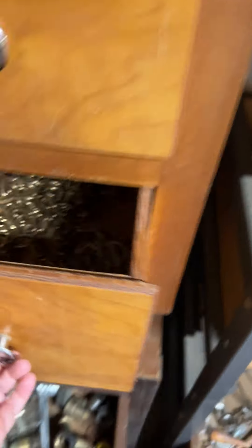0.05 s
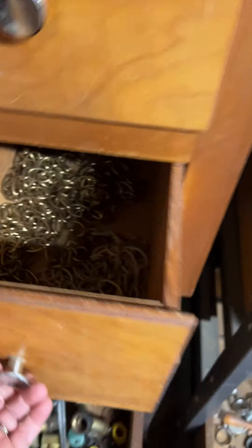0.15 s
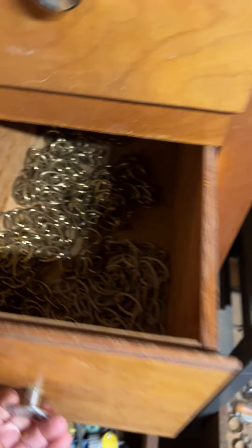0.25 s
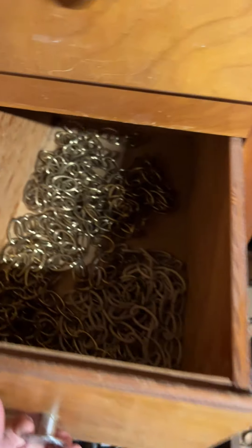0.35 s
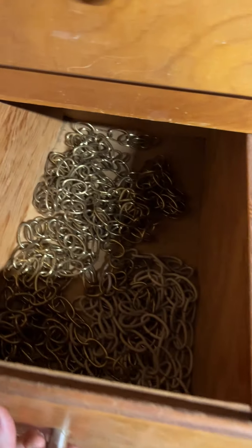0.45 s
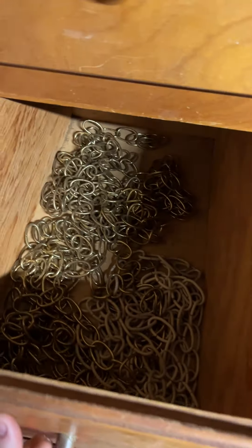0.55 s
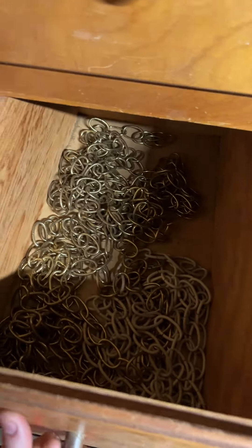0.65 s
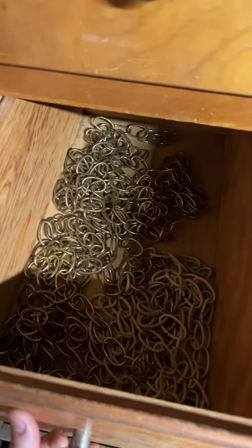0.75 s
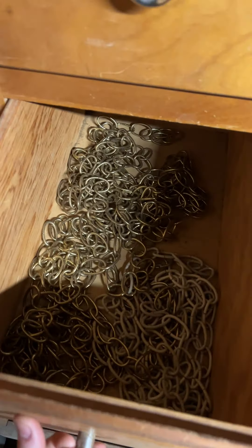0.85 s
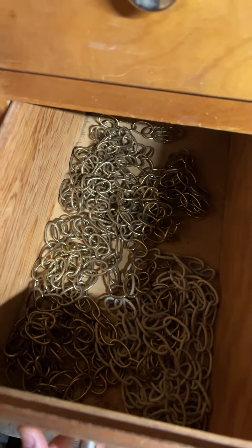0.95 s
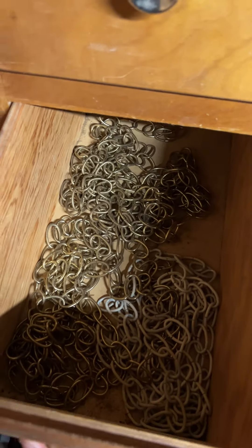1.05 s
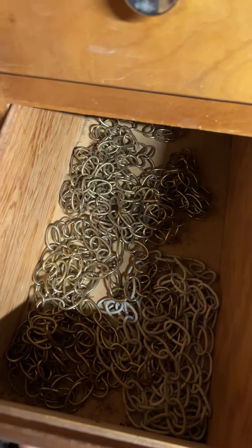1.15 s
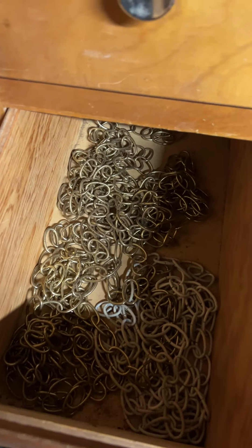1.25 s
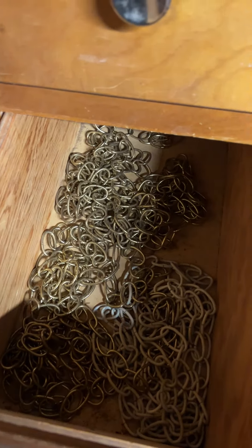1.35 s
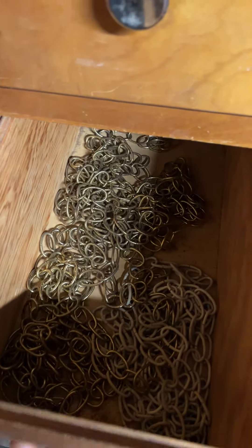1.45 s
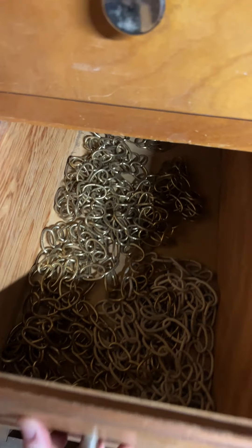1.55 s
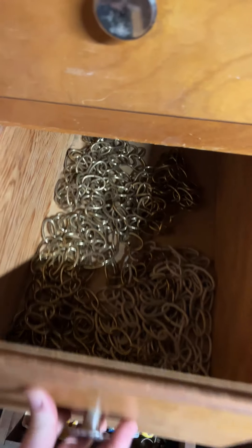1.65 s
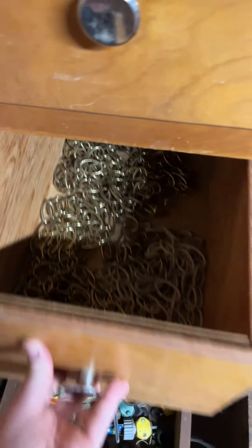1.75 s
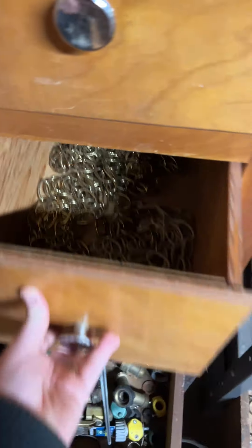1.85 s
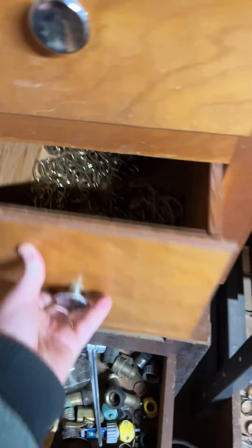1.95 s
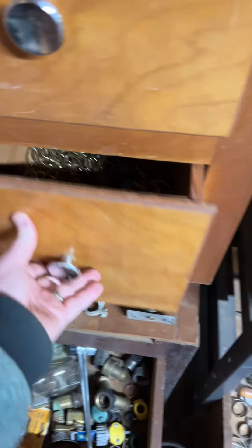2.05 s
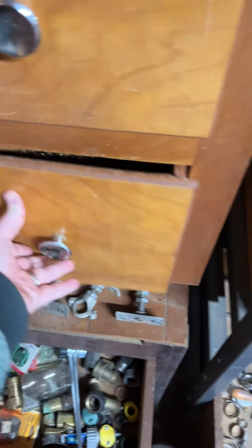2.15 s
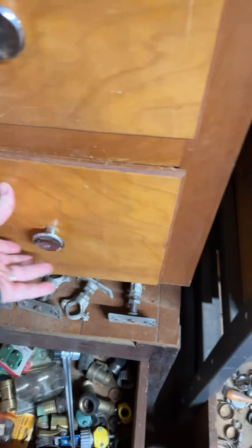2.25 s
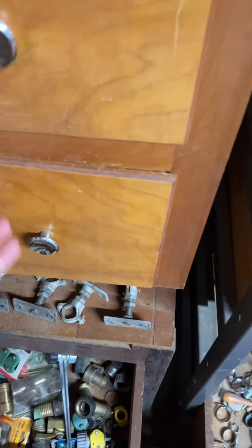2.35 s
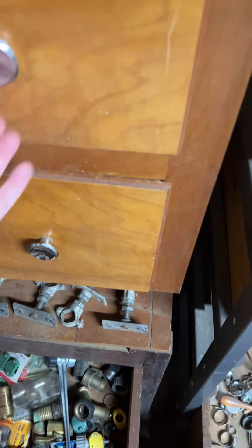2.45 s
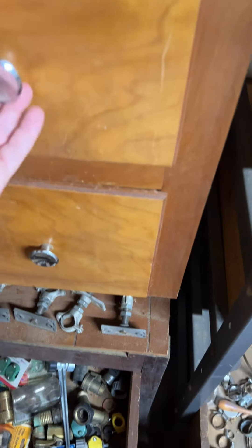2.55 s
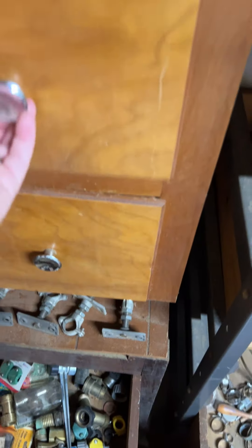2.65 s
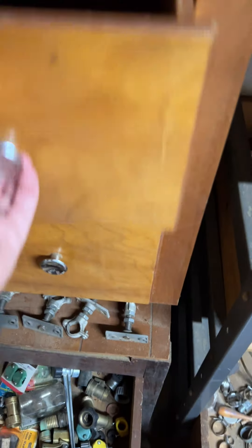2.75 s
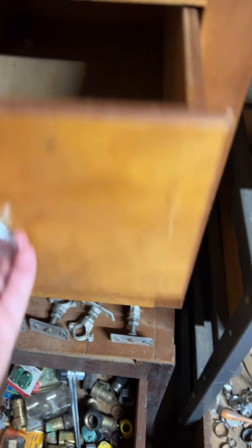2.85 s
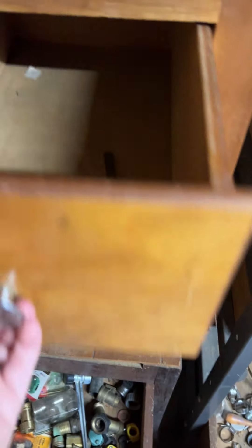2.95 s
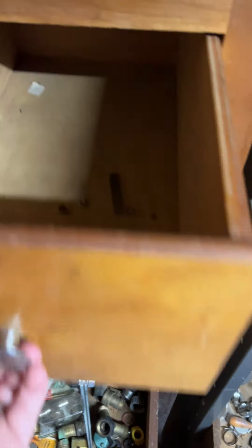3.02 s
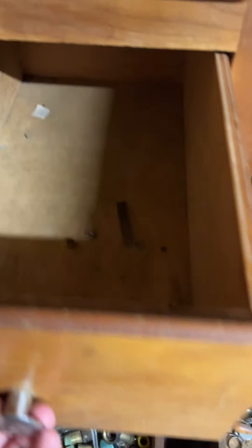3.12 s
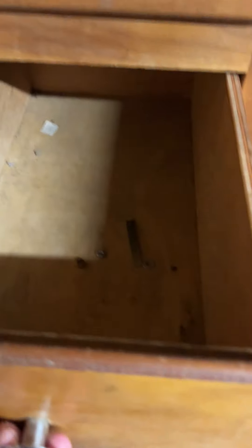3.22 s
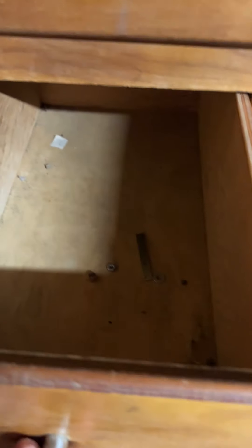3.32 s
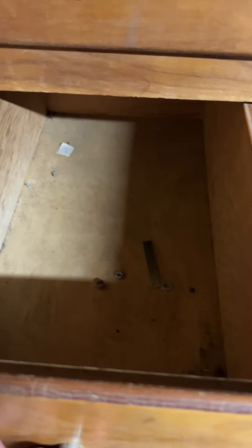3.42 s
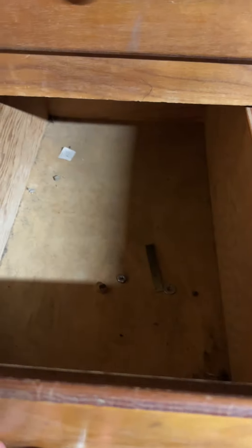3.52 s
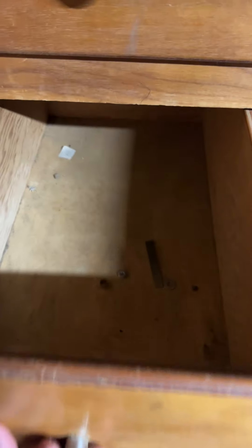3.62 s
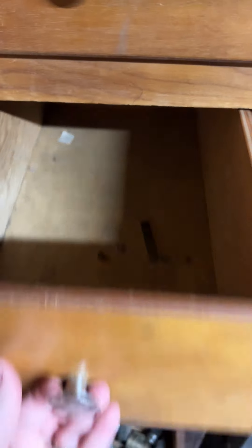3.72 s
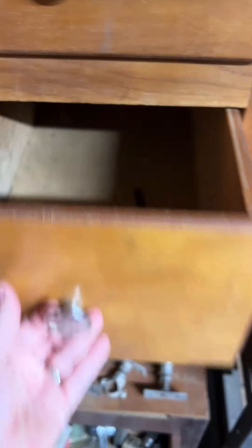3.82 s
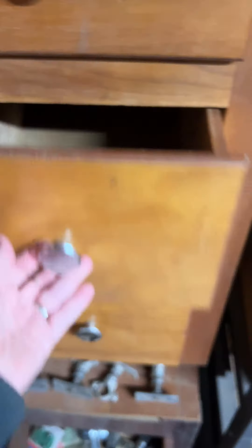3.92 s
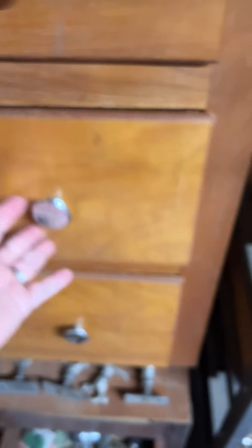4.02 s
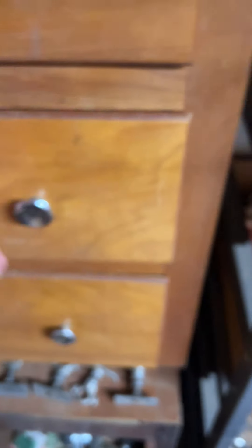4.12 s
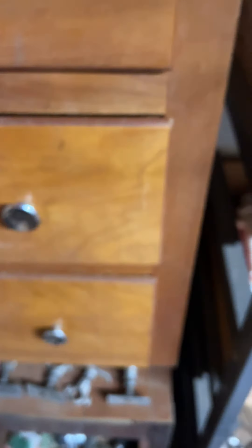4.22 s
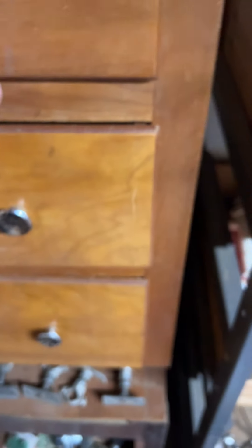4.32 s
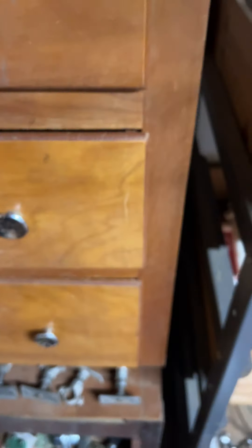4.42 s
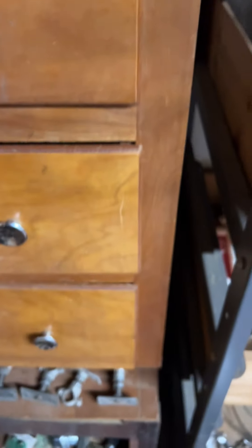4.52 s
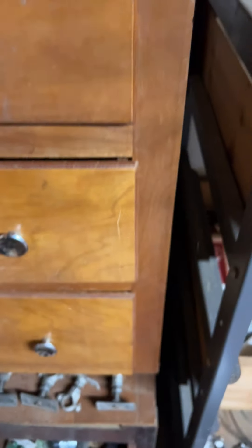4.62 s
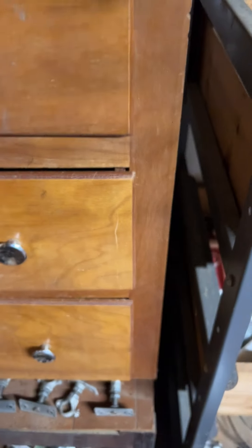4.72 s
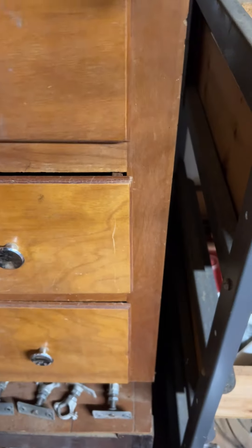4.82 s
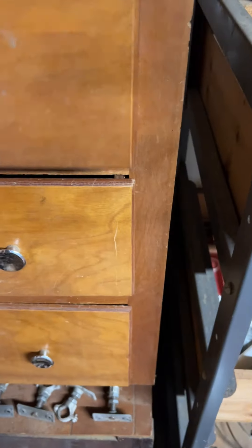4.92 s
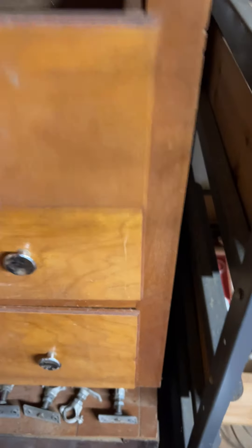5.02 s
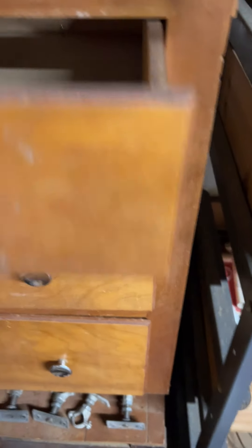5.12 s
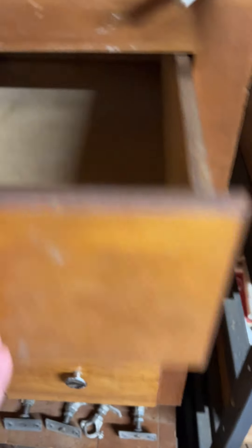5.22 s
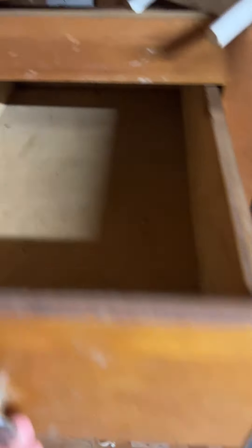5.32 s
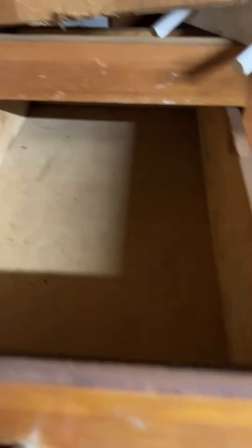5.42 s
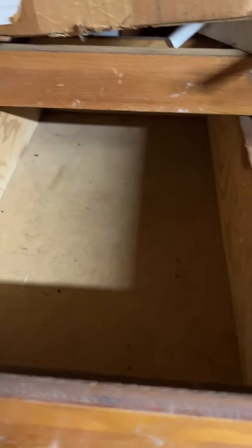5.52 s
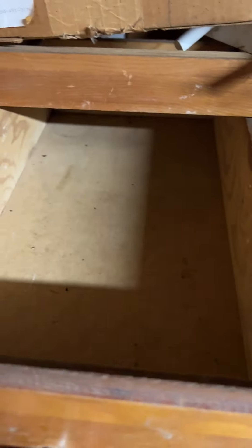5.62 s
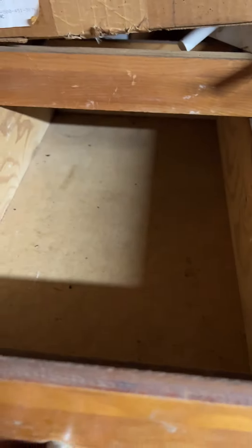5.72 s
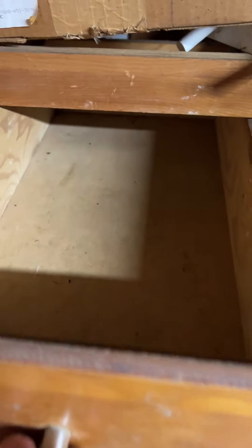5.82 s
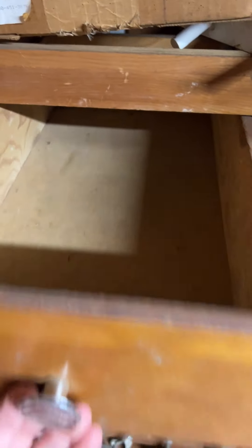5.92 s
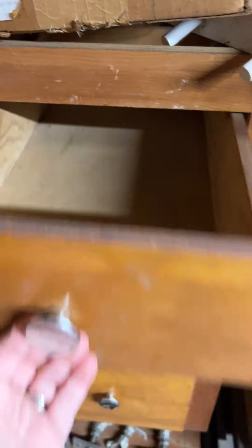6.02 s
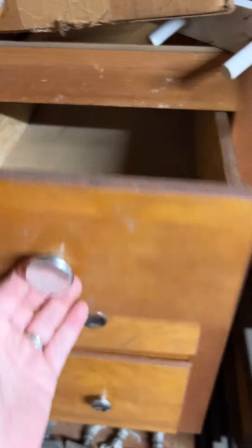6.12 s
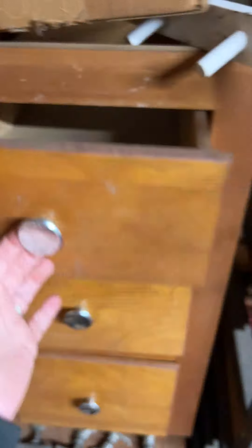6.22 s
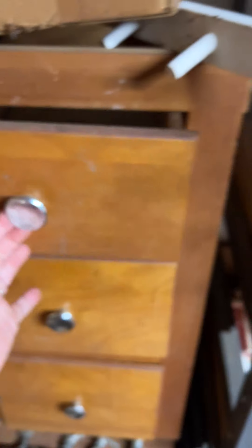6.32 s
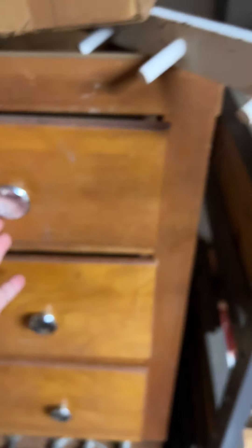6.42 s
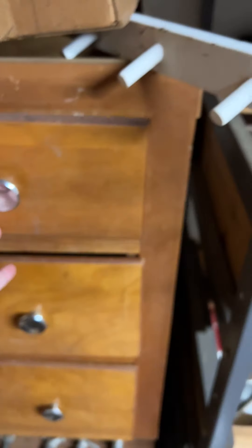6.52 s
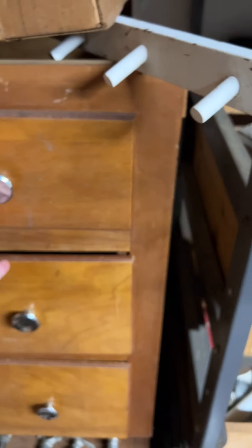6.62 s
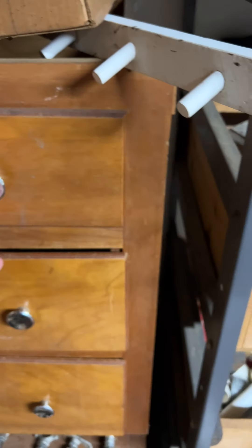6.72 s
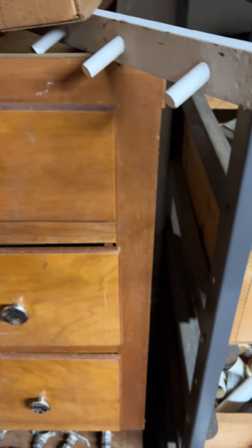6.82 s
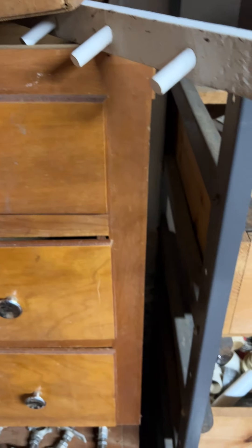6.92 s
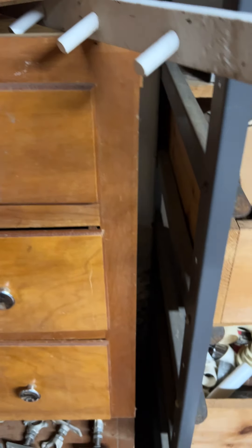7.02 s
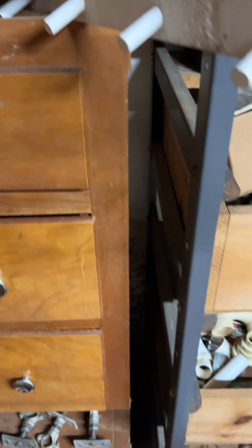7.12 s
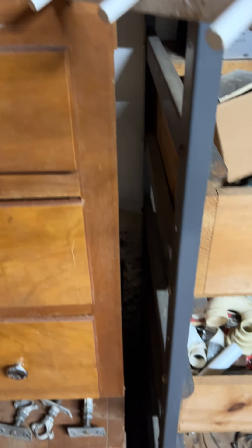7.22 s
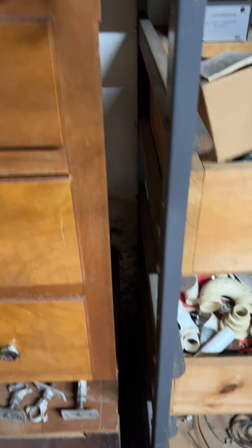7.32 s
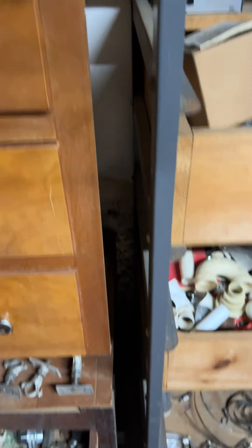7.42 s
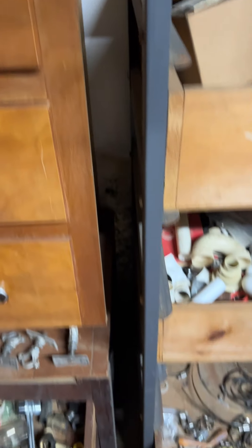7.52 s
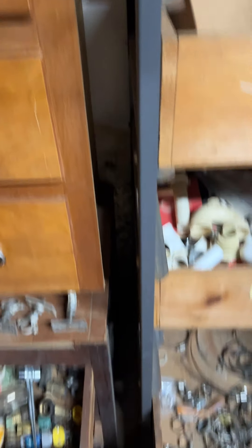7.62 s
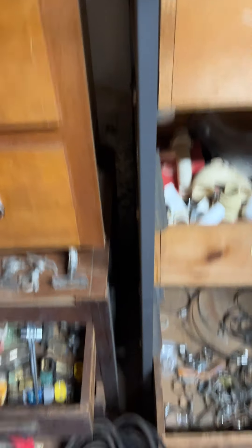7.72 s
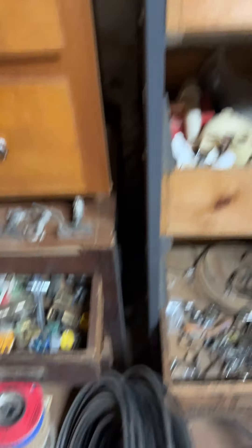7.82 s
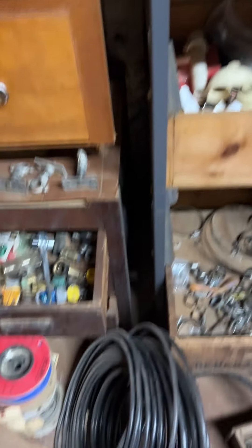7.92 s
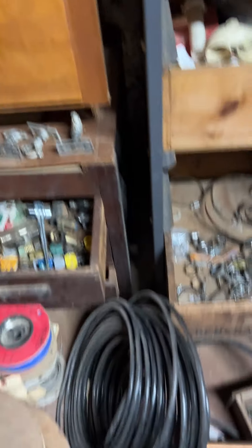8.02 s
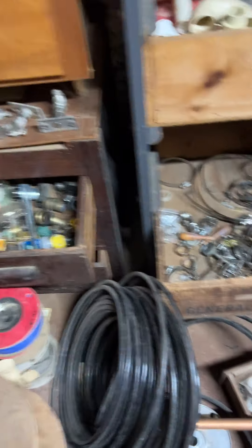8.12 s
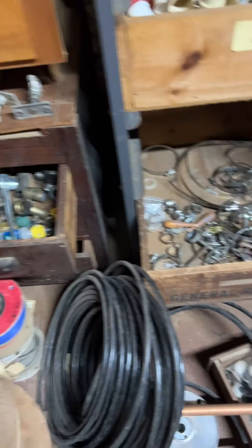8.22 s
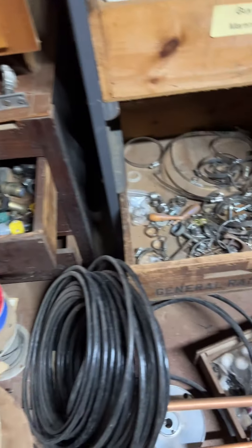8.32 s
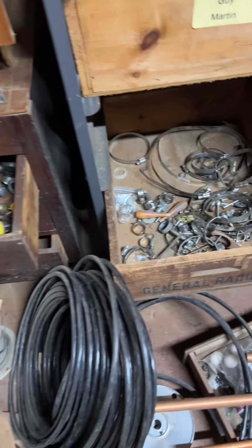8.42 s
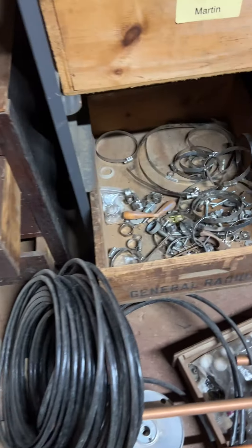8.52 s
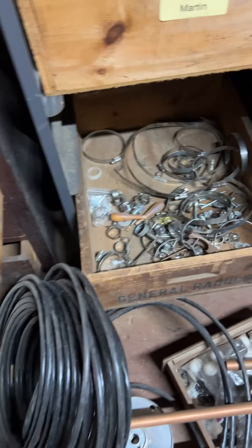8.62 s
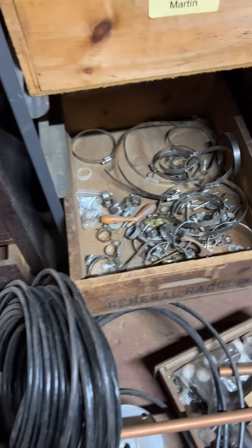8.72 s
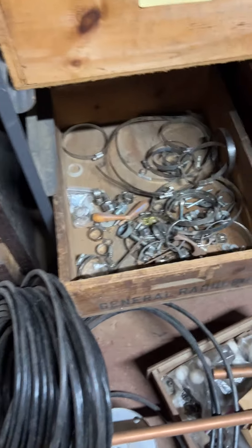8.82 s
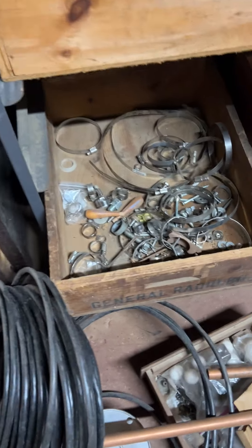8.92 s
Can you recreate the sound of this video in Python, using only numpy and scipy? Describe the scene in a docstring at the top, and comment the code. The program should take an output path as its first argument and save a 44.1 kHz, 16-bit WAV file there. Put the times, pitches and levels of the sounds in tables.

```python
"""Three wooden drawers of a workshop chest are pulled out and pushed shut in turn, close by. Wood grinds on
wood: random slips shake each box, and noise-fed blows make its knocks and grit snaps. The low drawer hisses
under its load of clicking chain, the middle one judders and slams, the top runs light. A large room answers
with fading noise echoes over a soft rumble; at the end someone shuffles on, heard as brushes of filtered noise,
a footfall, light taps and a creak made of small ticks."""
import sys
import numpy as np
from scipy import signal
from scipy.fft import rfft, irfft, next_fast_len
from scipy.io import wavfile
from scipy.ndimage import uniform_filter1d, map_coordinates

SR = 44100
rng = np.random.default_rng(int(sys.argv[2]) if len(sys.argv) > 2 else 0)


def digitize_waveform(pressure):
    """Quantize a signal to 16-bit integers and store it at the path in sys.argv[1].

    Rows of a 2-D input are taken as channels; values are limited to [-1, 1].
    """
    field = np.atleast_2d(pressure).T
    bounded = np.clip(field, -1, 1)
    quanta = np.round(bounded * 32767).astype(np.int16)
    wavfile.write(sys.argv[1], SR, quanta)


N = 395136
TIME = np.arange(N) / SR

# Levels in these tables are set before the final mix.
# Overall tone of each drawer's box: [pitch_hz, level_db]
LOW_COLOUR = [(25, -23), (70, -1), (150, 1.5), (230, -6.5), (310, -13), (560, -14), (1400, -21),
              (3300, -23.5), (12000, -36.5)]
MIDDLE_COLOUR = [(25, -27), (140, 0), (290, -11), (560, -15.5), (1100, -26), (2200, -30), (3600, -38),
                 (12000, -50.5)]
TOP_COLOUR = [(25, -12.5), (100, 7), (270, -6.5), (600, -11), (1200, -23.5), (2600, -31.5), (12000, -58.5)]
# Panel resonances, and hollows, on top of that tone: [pitch_hz, width_hz, gain_db]
LOW_PANELS = [(224.6, 18, 6), (440, 75, 3.5), (560, 45, -4), (780, 110, 4), (1138, 70, 3.5)]
MIDDLE_PANELS = [(134, 38, 2.5), (375, 35, -3.5), (470, 65, 5), (880, 110, 2), (2700, 180, 3.5)]
TOP_PANELS = [(415, 65, 7), (735, 110, -9.5), (910, 60, 1.5), (1134, 110, 3), (1540, 170, -3),
              (1796, 69, 5), (2120, 150, 4), (6030, 600, 4)]
# What the chest's frame rings with under each knock and tap: [pitch_hz, width_hz, gain_db]
FRAME_MODES = [(250, 37, 4.5), (359, 35, 3), (444, 45, 4), (655, 55, 4.5), (1070, 130, -3.5),
               (2760, 300, 4)]
# Drawers bump runners, stops and frame; harder means less thump, more crack: [start_s, clack_db, hardness_db]
KNOCKS = [(0.292, -20.5, -2), (0.579, -38.5, -20.5), (1.571, -16, -6.5), (1.783, -23.5, -17),
          (1.833, -16.5, -9.5), (2.217, -36.5, -21.5), (2.501, -33, 2), (2.695, -31, -19),
          (2.724, -23.5, 3), (3.123, -14, -12), (3.677, -21.5, -9.5), (3.841, -14.5, 1),
          (3.897, -16.5, -11.5), (4.041, -17.5, -13), (4.061, -6, -0.5), (4.07, -1, 10), (4.096, -17.5, -9),
          (4.447, -39.5, 1), (4.648, -40, -17), (4.705, -35, 0), (4.853, -13, -3), (4.869, -7.5, 1),
          (4.939, -25.5, 2.5), (5.54, -30, 1), (5.644, -28, 9.5), (5.953, -24, 0.5), (5.991, -21.5, -1.5),
          (6.631, -27, -6.5), (6.643, -21.5, -8.5), (6.665, -24.5, -14)]
# Grit snaps in the runners: [start_s, peak_db]
SNAPS = [(0.578, -30), (2.786, -21.5), (3.0056, -22.5), (3.038, -25.5), (3.123, -10.5), (3.276, -27.5),
         (3.545, -34), (3.675, -20.5), (5.042, -24), (5.114, -18), (5.1339, -19), (5.2545, -22),
         (5.3401, -25.5), (5.399, -31.5), (5.44, -30.5), (5.5825, -39.5), (5.9893, -24.5), (6.0787, -12),
         (6.119, -14.5), (6.1479, -19), (6.314, -27)]
# Stick and slip locks onto a panel, with a drifting pitch: [middle_s, length_s, mean_pitch_hz, peak_db]
JUDDERS = [(2.569, 0.12, 352, -34), (2.947, 0.15, 131.7, -12.5), (3.701, 0.077, 137, -14),
           (3.768, 0.09, 139.8, -5), (5.556, 0.06, 400.4, -34.5)]
# Hand, sleeve and shoes brush past things: [middle_s, length_s, level_db, centre_hz]
BRUSHES = [(2.561, .24, -54, 4800), (3.275, .3, -61, 7030), (4.701, 0.23, -58.5, 3600),
           (4.85, 0.08, -40.5, 5450), (5.8, .34, -58.5, 7000), (6.4, 0.82, -54.5, 9600),
           (7.38, 0.17, -66.5, 3400), (7.851, 1, -70.5, 5930), (8.405, 0.133, -60.5, 3000),
           (8.42, 0.33, -60, 600), (8.91, 0.8, -64, 5200)]
# A footfall, then small things tapped in passing: [start_s, tick_db, thump_db, thump_hz, ring_db]
TAPS = [(7.662, -39, -46.5, 78, -71), (7.970, -34.5, -53, 165, -56), (8.63, -51.5, -48.5, 565.3, -66)]
# Tones of the ring in every tap: [pitch_hz, level_db against ring_db]
TAP_MODES = [(1098, -2), (1873, 5), (2379, -1)]
# Tone of the still room: [pitch_hz, relative_level_db]
AIR_COLOUR = [(15, -12.5), (58, -2), (150, -13.5), (1800, -31), (5000, -44.5), (12000, -52.5)]
# How long the room takes to fade by 60 dB: [pitch_hz, fade_s]
ROOM_FADE = [(150, 0.85), (550, 0.45), (10000, 0.25)]
# Level of the deep rumble over time: [time_s, level_db]
BACKGROUND_LEVEL = [(0, -54.5), (6.3, -50.5), (7.1, -76)]
# How the two microphone ports differ: [pitch_hz, left_minus_right_db]
PORT_BALANCE = [(400, .4), (620, 7), (1050, 5.9), (1700, 0.7)]
# How far the left port leads the right: [pitch_hz, lead_radians]
PORT_LEAD = [(360, 0), (550, 1.3), (1300, 0.38), (3270, 0.1), (3960, 1), (4740, -1.96), (5450, -6),
             (8000, -7), (12000, -9.5)]
# Microphone colour: [pitch_hz, gain_db]
PRESENCE = [(9000, 0), (12200, 4.5), (13000, -15.5)]
# A stroke speeds up, glides and slows to rest; its rub and hiss get duller as it goes. In order:
# low drawer out, its chain slumps, it creeps on, a last tug, eased back, first shove, low drawer in;
# middle drawer out, on to its stop, it settles, middle drawer in; top drawer out, top drawer in.
# [start_s, speeding_up_s, gliding_s, slowing_s, rumble_db, rub_db, hiss_db, dulling_by_the_end_db]
STROKES = [(-0.1, 0.12, 0.45, .18, -30.5, -34, -35, 4.5), (0.6, 0.041, .01, 0.11, -38, -69, -54, 6),
           (0.68, 0.24, .15, .13, -52.5, -53.5, -55.5, 0), (0.912, 0.024, 0.035, 0.049, -65, -52, -46, 7.5),
           (1.1, 0.24, .05, 0.071, -54, -59, -72, 2), (1.41, 0.17, 0.024, 0.064, -31, -41, -36.5, 3),
           (1.58, .12, 0.44, 0.16, -26, -30.5, -34, 7), (2.65, 0.12, 0.19, 0.25, -17.5, -20, -38.5, 17.5),
           (3.04, 0.054, 0.021, .27, -24, -28.5, -43.5, 9.5),
           (3.3, 0.075, 0.022, .11, -34.5, -44.5, -56, 1), (3.53, 0.18, .26, 0.18, -17.5, -22, -36.5, 4.5),
           (4.84, .2, .27, 0.24, -28.5, -25.5, -48, 9), (5.81, 0.18, 0.49, 0.38, -26.5, -25, -44, 35.5)]

# When each drawer is in hand: from s, to s
LOW_SPAN, MIDDLE_SPAN, TOP_SPAN = (-1, 2.45), (2.45, 4.6), (4.6, 7)
RUMBLE_POWER, RUB_POWER, HISS_POWER = 1.2, 1.9, 1.58  # each grows as this power of the speed
SLIP_RATE, CATCH_RATE = 9000, 110  # fine slips and coarser catches of the wood grain, a second
FLUTTER_DB, SURGE_DB = 1.4, 0.78  # fast and slow swings of the pressure
WANDER_DB = 2.5  # depth of the resonances' flaring
CRACK_PER_HARDNESS = 0.18  # dB of crack for each dB of hardness
CLEAN_PER_HARDNESS = 0.43  # a hard blow chatters less: dB for each dB of hardness above 0
# Something creaks underfoot, its slips slowing as the weight settles
CREAK_S, CREAK_LENGTH_S, CREAK_DB, CREAK_HZ = 8.51, .21, -45.5, 1600
CREAK_FIRST_RATE, CREAK_LAST_RATE = 125, 35  # average slips a second
SLAM_S = 4.045  # the middle drawer hits the frame
CHAIN_DB = -9  # links against the low drawer's hiss
CHAIN_SLAM_DB, CHAIN_SETTLE_S = -45, 0.65  # links jolted by the slam, and their fade by 60 dB
TAP_THUMP_T60_S, TAP_T60_S = 0.16, 0.12  # time to fade by 60 dB
CUTOFF_HZ = 13450  # nothing is heard from here up


def amp(db):
    """Turn decibels into gain."""
    return 10 ** (np.asarray(db) / 20)


def unit(x):
    """Scale to an average (rms) level of 1."""
    return x / np.sqrt(np.mean(x ** 2) + 1e-20)


def along(points, hz):
    """Read a table of pitch and value, with straight lines between points on a log pitch axis."""
    f, v = np.transpose(points)
    return np.interp(np.log(hz + 1), np.log(f + 1), v)


def wobble(rate):
    """A smooth random curve with this many random points a second."""
    return map_coordinates(rng.standard_normal(int(N * rate / SR) + 4), [TIME * rate])


def swell(middle, length):
    """A smooth rise and fall."""
    return np.cos(np.pi * np.clip((TIME - middle) / length, -.5, .5)) ** 2


def filtered(x, response):
    """Change the strength, and perhaps timing, of each pitch in x."""
    n = x.shape[-1]
    m = next_fast_len(n + 8192)
    spectrum = rfft(x, m) * response(np.fft.rfftfreq(m, 1 / SR))
    return irfft(spectrum, m)[..., :n]


def band(x, lo, hi):
    """Keep the pitches between lo and hi."""
    return signal.sosfilt(signal.butter(3, [lo, hi], "band", fs=SR, output="sos"), x)


def add(track, s, sound):
    """Mix a sound in at time s."""
    part = track[round(s * SR):][:len(sound)]
    part += sound[:len(part)]


def ring(x, body):
    """Every push in x sets off the body's ringing."""
    return signal.fftconvolve(x, body)[:len(x)]


def background():
    """A deep noise rumble lies under the drawers and fades once they are left alone."""
    level = amp(np.interp(TIME, *np.transpose(BACKGROUND_LEVEL)))
    return level * unit(band(rng.standard_normal(N), 46, 110))


def air(level_db):
    """The faint noise of the still room, with its bass alike at both ports."""
    mid, side = filtered(rng.standard_normal((2, N)), lambda hz: amp(along(AIR_COLOUR, hz)))
    side = filtered(side, lambda hz: hz / (hz + 900))
    return amp(level_db) * unit(np.array([mid + side, mid - side]))


def room(x):
    """The workshop answers with fading noise; the bass lingers and is alike at both ports."""
    hz, t, z = signal.stft(rng.standard_normal((2, SR)), SR, nperseg=256)
    t60 = along(ROOM_FADE, hz)[:, None]
    fade = amp(-60 * t / t60) / np.sqrt(t60 * SR / np.log(1e6))  # long and short fades carry like energy
    mid, side = signal.istft(z * fade, SR, nperseg=256)[1]
    side = filtered(side, lambda f: f ** 2 / (f ** 2 + 650 ** 2))
    return np.array([ring(x, mid + side), ring(x, mid - side)])


def walls(x):
    """Quick echoes from the cabinet and clutter reach the two ports with opposite signs."""
    t = np.arange(SR // 10) / SR
    echoes = band(rng.standard_normal(len(t)) * amp(-60 * t / 0.053), 280, 14000)
    side = ring(x, echoes / np.linalg.norm(echoes))
    return np.array([side, -side])


def box(colour, panels, ripple_db=3, ringing=1, size=16384):
    """How a wooden box answers one push: its tone, main panels (deepened by ringing) and many small ripples."""
    hz = np.fft.rfftfreq(size, 1 / SR)
    peaks = sum(gain * np.exp(-2 * ((hz - centre) / width) ** 2) for centre, width, gain in panels)
    thicket = map_coordinates(rng.standard_normal(size), [3 * np.sqrt(hz)])
    db = along(colour, hz) + ringing * peaks + ripple_db * thicket * hz / (hz + 300)
    # Minimum phase: the answer starts at once, with nothing before the push
    cepstrum = irfft(np.log(amp(db)))
    cepstrum[1:size // 2] *= 2
    cepstrum[size // 2 + 1:] = 0
    return irfft(np.exp(rfft(cepstrum)))[:size // 2]


def slips(rate, spread_db):
    """Tiny slips of fibres at random times and of uneven size."""
    happens = rng.random(N) < rate / SR
    return unit(happens * rng.standard_normal(N) * amp(spread_db * rng.standard_normal(N)))


def strike(body, lo, hi, t60, scatter):
    """One blow heard in a band, peak 1: a push, then the loose joints chatter and die away."""
    t = np.arange(SR // 2) / SR
    force = scatter * rng.standard_normal(len(t)) * amp(-60 * t / t60)
    force[0] += 1
    sound = band(ring(force, body), lo, hi)
    return sound / np.abs(sound).max()


def creak():
    """A short run of uneven slips, each a small dry tick, tending further apart."""
    progress = (TIME - CREAK_S) / CREAK_LENGTH_S
    slowing = np.interp(progress, [0, 1], [CREAK_FIRST_RATE, CREAK_LAST_RATE], left=0, right=0)
    rate = slowing * amp(3.5 * wobble(90))
    lo, hi = CREAK_HZ / np.sqrt(2), CREAK_HZ * np.sqrt(2)
    out = np.zeros(N)
    # A slip happens each time the running count passes a whole number
    for i in np.flatnonzero(np.diff(np.floor(np.cumsum(rate) / SR))):
        size = amp(CREAK_DB + rng.normal(0, 2)) * np.interp(progress[i], [0, .5, 1], [.2, 1, .5])
        add(out, TIME[i], size * strike([1.], lo, hi, t60=0.027, scatter=0.18))
    return out


def tone(hz, t60):
    """Half a second of a pure tone that dies away."""
    t = np.arange(SR // 2) / SR
    return np.sin(2 * np.pi * hz * t) * amp(-60 * t / t60)


def brushes():
    """Skin, cloth and soles brush softly: uneven noise, strongest around one pitch."""
    out = np.zeros(N)
    fibres = rng.standard_normal(N) * amp(2.2 * wobble(110))
    for s, length, db, centre in BRUSHES:
        hump = lambda hz: (hz * centre / (hz ** 2 + centre ** 2)) ** 2 / (1 + hz / centre)
        out += amp(db) * swell(s, length) * unit(filtered(fibres, hump))
    return out


def taps():
    """A footfall and light taps on small things: each a tick of struck wood, a low thump and a ring of dying
    tones."""
    out = np.zeros(N)
    for s, tick_db, thump_db, thump_hz, ring_db in TAPS:
        tick = strike(box(LOW_COLOUR, FRAME_MODES), 280, 10490, t60=0.0494, scatter=0.15)
        thump = tone(thump_hz, TAP_THUMP_T60_S)
        clink = sum(amp(db) * tone(hz, TAP_T60_S) for hz, db in TAP_MODES)
        add(out, s, amp(tick_db) * tick + amp(thump_db) * thump + amp(ring_db) * clink)
    return out


def shudder(db, t60):
    """After the slam the whole chest shakes and settles: random slips ring the middle box and fade."""
    t = np.maximum(TIME - SLAM_S, 0)
    shaken = ring(slips(2500, spread_db=3.5), box(MIDDLE_COLOUR, MIDDLE_PANELS))
    return amp(db - 60 * t / t60) * (t > 0) * unit(band(shaken, 55, 1600))


def judders():
    """The runner grips and lets go in step with a panel: a short groan of unsteady pitch."""
    out = np.zeros(N)
    drift = 1 + .025 * wobble(45)
    for s, length, hz, db in JUDDERS:
        phase = 2 * np.pi * np.cumsum(hz * drift) / SR
        out += amp(db) * swell(s, length) * np.sin(phase)
    return out


def speed(start, rise, glide, fall):
    """Speed of a stroke, 0 to 1: a steady rise, a glide and a steady fall."""
    end = start + rise + glide + fall
    return np.clip(np.minimum((TIME - start) / rise, (end - TIME) / fall), 0, 1)


def chain(link_hz, spread, link_t60, count=5000):
    """Links click together while the low drawer moves, and when the slam jolts them: many short dying tones."""
    t = np.arange(SR // 80) / SR
    pitch, size = rng.standard_normal((count, 2)).T[:, :, None]
    hz = np.minimum(link_hz * np.exp(spread * pitch), SR / 2)
    clicks = amp(4 * size - 60 * t / link_t60) * np.sin(2 * np.pi * hz * t)
    at = rng.integers(N, size=(count, 1)) + np.arange(len(t))
    rattle = unit(np.bincount(at.ravel(), clicks.ravel(), N)[:N])
    moved = np.zeros(N)
    for *timing, _, _, hiss_db, _ in STROKES:
        if timing[0] < LOW_SPAN[1]:
            moved += amp(CHAIN_DB + hiss_db) * speed(*timing) ** HISS_POWER
    settling = amp(CHAIN_SLAM_DB - 60 * np.abs(TIME - SLAM_S) / CHAIN_SETTLE_S)
    return (moved + (TIME > SLAM_S) * settling) * rattle


def knocks(colour, span, lowest_hz, crack_t60, crack_db, loose):
    """One drawer's bumps, each a thump, a clack and a crack; a loose load smears the crack."""
    out = np.zeros(N)
    for s, db, hard_db in KNOCKS:
        if span[0] <= s < span[1]:
            body = box(colour, FRAME_MODES)
            chatter = amp(-CLEAN_PER_HARDNESS * max(hard_db, 0))
            thump = strike(body, lowest_hz, 320, t60=.29, scatter=.04)
            clack = strike(body, 320, 1500, t60=0.16, scatter=0.066 * chatter)
            crack = strike(body, 1800, 13000, t60=crack_t60, scatter=loose * chatter)
            add(out, s, amp(db - hard_db) * thump)
            add(out, s, amp(db) * clack)
            add(out, s, amp(db + crack_db + CRACK_PER_HARDNESS * hard_db) * crack)
    return out


def snaps(colour, panels, span):
    """Grit snaps in one drawer's runners: short, bright blows that ring its panels strongly."""
    out = np.zeros(N)
    for s, db in SNAPS:
        if span[0] <= s < span[1]:
            body = box(colour, panels, ringing=1.7)
            add(out, s, amp(db) * strike(body, 850, 10000, t60=0.049, scatter=0.25))
    return out


def wander(x, depth_db):
    """As the contact point travels, the box's resonances flare up and die back at random."""
    z = signal.stft(x, nperseg=1024)[2]
    field = uniform_filter1d(rng.standard_normal(z.shape), size=4, axis=0)  # smooth over pitch
    field = uniform_filter1d(field, size=5, axis=1)  # smooth over time
    return signal.istft(z * amp(depth_db * unit(field)), nperseg=1024)[1][:N]


def slide(span, colour, panels, catch_db):
    """Slips and catches on the runners shake the box under uneven pressure; faster is louder and brighter."""
    pressure = amp(FLUTTER_DB * wobble(70) + SURGE_DB * wobble(22))
    catches = band(slips(CATCH_RATE, spread_db=1), 180, 3000)
    force = slips(SLIP_RATE, spread_db=2.0) + amp(catch_db) * catches
    shaken = wander(ring(force * pressure, box(colour, panels, ripple_db=1.87)), WANDER_DB)
    below_300 = filtered(shaken, lambda hz: 1 / (1 + (hz / 300) ** 6))
    below_2000 = filtered(shaken, lambda hz: 1 / (1 + (hz / 2000) ** 6))
    rumble, rub, hiss = unit(below_300), unit(below_2000 - below_300), unit(shaken - below_2000)
    out = np.zeros(N)
    for start, rise, glide, fall, rumble_db, rub_db, hiss_db, dull_db in STROKES:
        if span[0] <= start < span[1]:
            v = speed(start, rise, glide, fall)
            progress = np.clip((TIME - start) / (rise + glide + fall), 0, 1)
            dulling = amp(-dull_db * progress ** 2)
            out += amp(rumble_db) * v ** RUMBLE_POWER * rumble
            out += dulling * amp(rub_db) * v ** RUB_POWER * rub
            out += dulling * amp(hiss_db) * v ** HISS_POWER * hiss
    return out


def scene():
    """Three drawers in turn, in the room."""
    sliding = (slide(LOW_SPAN, LOW_COLOUR, LOW_PANELS, catch_db=-4.5)
               + slide(MIDDLE_SPAN, MIDDLE_COLOUR, MIDDLE_PANELS, catch_db=-6)
               + slide(TOP_SPAN, TOP_COLOUR, TOP_PANELS, catch_db=-5)
               + chain(link_hz=4600, spread=.5, link_t60=0.023))
    bumps = (knocks(LOW_COLOUR, LOW_SPAN, lowest_hz=60, crack_t60=0.06, crack_db=-3.5, loose=0.72)
             + knocks(MIDDLE_COLOUR, MIDDLE_SPAN, lowest_hz=44.6, crack_t60=0.03, crack_db=-3, loose=0.12)
             + knocks(TOP_COLOUR, TOP_SPAN, lowest_hz=115.2, crack_t60=0.098, crack_db=-14.5, loose=0.19))
    grit = (snaps(LOW_COLOUR, LOW_PANELS, LOW_SPAN)
            + snaps(MIDDLE_COLOUR, MIDDLE_PANELS, MIDDLE_SPAN)
            + snaps(TOP_COLOUR, TOP_PANELS, TOP_SPAN))
    drawers = amp(-2.0) * sliding + amp(-1.5) * (bumps + grit) + judders() + shudder(db=-38.5, t60=2.3)
    near = drawers + brushes() + taps() + creak()
    echoes = amp(-10.0) * walls(near) + amp(-12.5) * room(near)
    return near + echoes + air(level_db=-61.0) + background()


def record(dry):
    """Each port colours and shifts the sound its own way; loud peaks are rounded and the treble ends steeply."""
    sides = np.array([[.5], [-.5]])  # left, right: half of each difference
    gain = lambda hz: amp(along(PRESENCE, hz) + sides * along(PORT_BALANCE, hz))
    heard = filtered(dry, lambda hz: gain(hz) * np.exp(1j * sides * along(PORT_LEAD, hz)))
    rounded = heard / (1 + (heard / .93) ** 6) ** (1 / 6)
    return filtered(rounded, lambda hz: hz < CUTOFF_HZ)


dry = scene()
out = record(dry)
digitize_waveform(out)
```